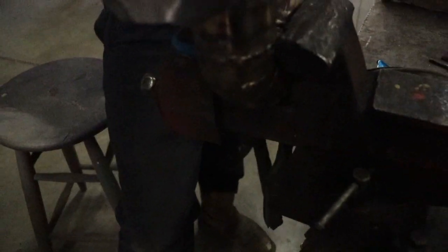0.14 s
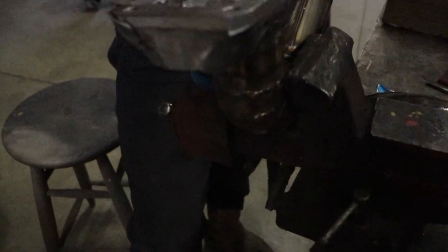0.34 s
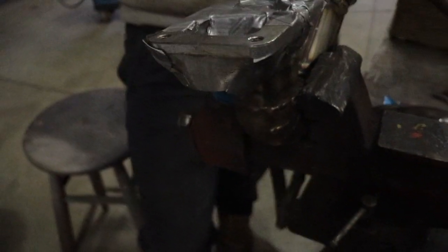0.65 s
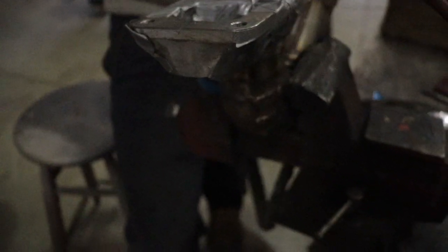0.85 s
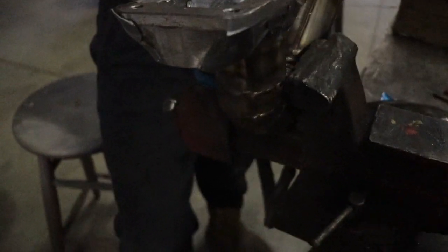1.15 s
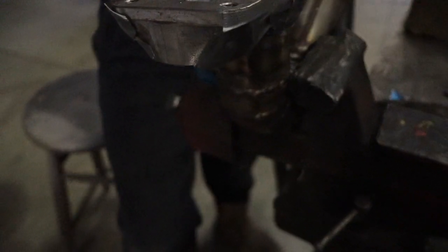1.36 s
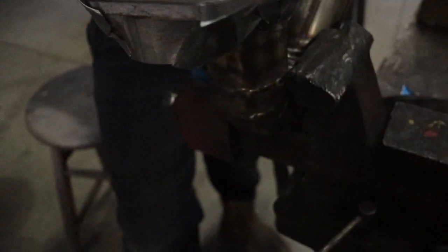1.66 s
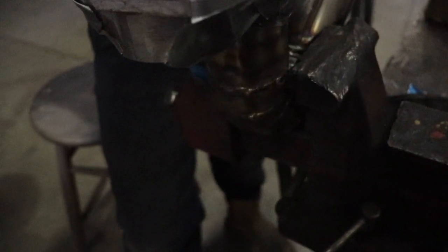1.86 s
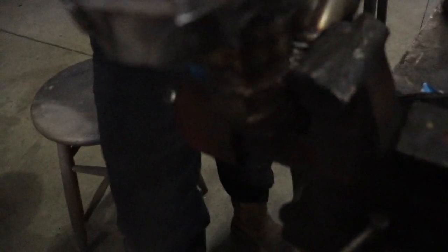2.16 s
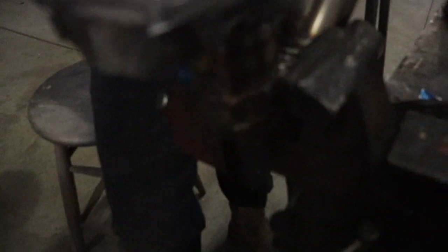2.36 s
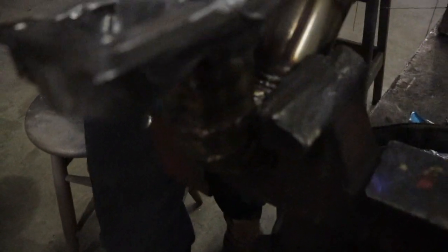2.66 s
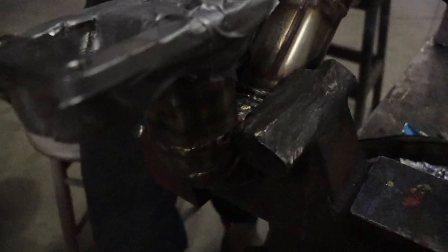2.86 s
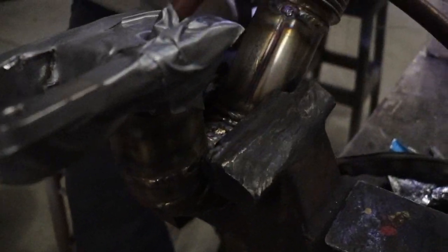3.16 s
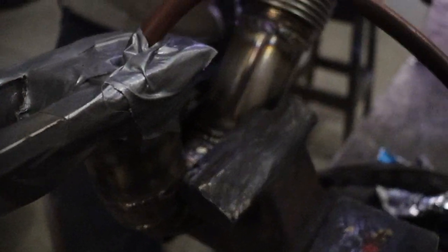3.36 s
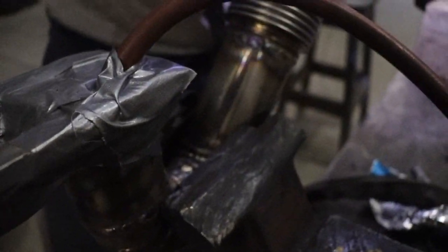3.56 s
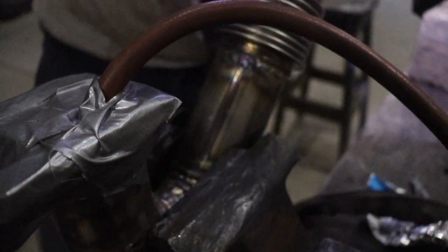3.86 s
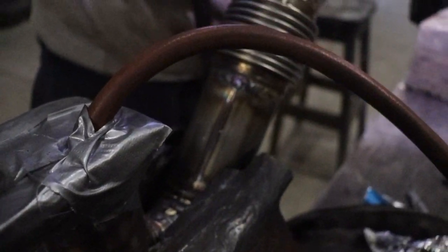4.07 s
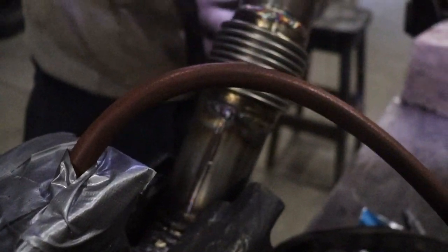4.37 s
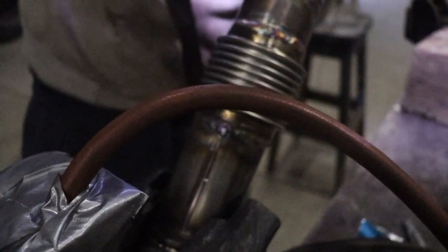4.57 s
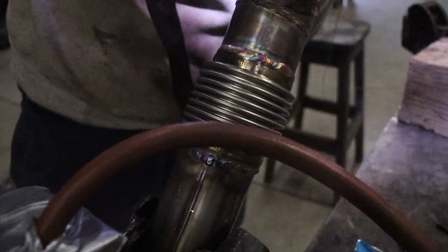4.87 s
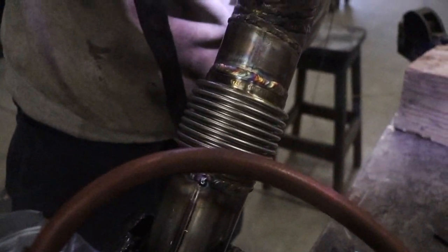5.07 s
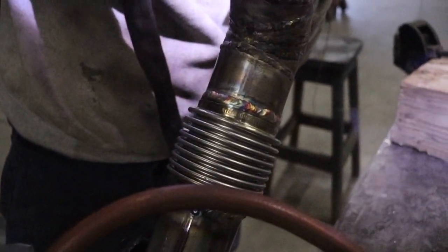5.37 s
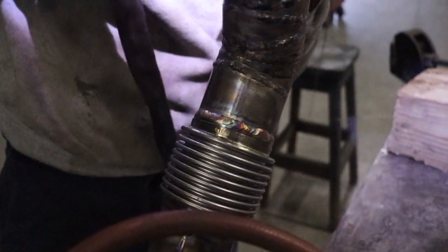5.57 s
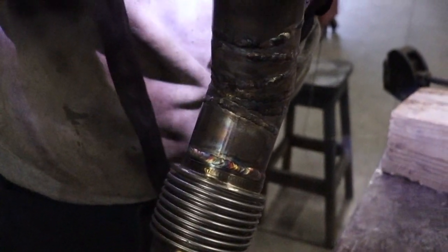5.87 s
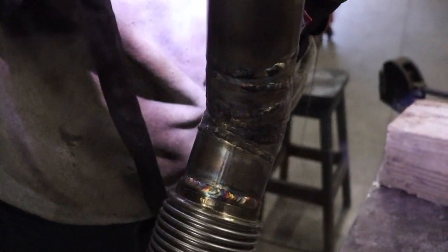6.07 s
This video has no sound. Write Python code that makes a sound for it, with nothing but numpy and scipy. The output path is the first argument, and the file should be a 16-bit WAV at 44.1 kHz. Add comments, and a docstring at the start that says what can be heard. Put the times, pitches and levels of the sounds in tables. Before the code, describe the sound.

A workshop hums with fan rush and low motor drone. A few small, dry, ringing clicks and a faint glove scrape come from a welding torch. A sharper click releases a gas surge, and at once a very loud, harsh mains-rate buzz throbs for under half a second and stops dead. A bright arc hiss remains, softening as the close microphone travels along the tube. Mono, little echo.

```python
"""A workshop where fans and a motor run all the time; TIG welding on stainless tubing.
The torch is handled: dry clicks that ring, and the grainy slide of a glove. The gas valve opens: a surge of noise.
The high-voltage starter sparks briefly in step with the mains: spike trains straight into the microphone's wiring.
The arc, noise with drifting resonances and sliding echoes, hisses as the microphone moves off.
The shop is shaped noise for the fans and wavering tones for the machines."""
import sys
import numpy as np
from scipy import signal
from scipy.fft import rfft, irfft, next_fast_len
from scipy.io import wavfile
from scipy.ndimage import map_coordinates

SR = 44100
rng = np.random.default_rng(int(sys.argv[2]) if len(sys.argv) > 2 else 0)


def generate_wav(sig):
    """Save sig (samples, or channels by samples) to the path in sys.argv[1] as 16-bit PCM at SR."""
    pcm = np.round(np.clip(np.atleast_2d(sig).T, -1, 1) * 32767).astype(np.int16)
    wavfile.write(sys.argv[1], SR, pcm)


N = 274302
TIME_S = np.arange(N) / SR

# Every spectrum is relative: its noise is scaled to rms 1 before use.
# arc resonances, low to high: pitch_hz, width_hz, level_db (relative), glide_share (of pitch, over the way)
ARC_RESONANCES = [(3210, 310, -7, .025), (6400, 850, -7, .06), (8230, 930, -6, .085)]
# arc hiss, body spectrum: freq_hz, density_db
ARC_BODY_SPECTRUM = [(1500, -25), (2500, 1.5), (4000, 0), (5000, -5), (6500, -1.5), (9600, -2),
                     (10400, -6.5), (11500, -25), (16000, -25)]
# arc hiss, top spectrum: freq_hz, density_db
ARC_TOP_SPECTRUM = [(9000, -30), (11000, 1.5), (12000, 1.5), (13200, 2), (14500, -8), (16000, -10.5)]
# the low resonance whistles least as the microphone passes side-on: centre_s, half_width_s, gain_db
WHISTLE_DIP = (4.3, 1.0, -4)
# argon flow spectrum: freq_hz, density_db
GAS_SPECTRUM = [(710, -34), (1200, -5), (1440, -4.5), (1750, -8), (1930, -7), (2680, -13), (3010, -7),
                (4170, -17), (4550, -15.5), (7020, -10), (10000, -18.5), (12900, -15), (16000, -28)]
# torch and gas valve clicks: start_s, level_db, t60_s, ring_hz, ring_db (relative to the click)
CLICKS = [(.4668, -47, .025, 14000, -9), (.492, -48, .025, 13500, -9), (.765, -58, .03, 13000, -3),
          (1.1633, -30, 0.033, 9100, -9), (1.178, -41, .03, 3550, -5), (1.2204, -31.5, 0.029, 4250, -6),
          (1.2335, -42, 0.035, 4300, -8), (1.764, -54, .04, 14000, -10), (1.7729, -47, .08, 3600, -6),
          (2.4124, -42, 0.044, 12500, -10), (2.4324, -28, 0.032, 7280, -8)]
# click body spectrum: freq_hz, density_db
CLICK_SPECTRUM = [(1500, -25), (2800, -4), (4500, 2), (7000, -0.5), (9500, -0.5), (11000, -8), (13500, 0),
                  (16000, -12)]
# torch body resonances under every click: pitch_hz, width_hz, level_db (relative)
TORCH_MODES = [(2750, 350, -11.5), (3570, 200, -10.5), (6370, 170, -15)]
# glove strokes over the work: start_s, length_s, level_db
GLOVE_STROKES = [(1.755, 0.11, -52.5), (1.848, 0.16, -50.5)]
# glove slide spectrum: freq_hz, density_db
GLOVE_SPECTRUM = [(1000, -25), (2500, 8.5), (5000, 2), (9000, -4), (11000, -16), (16000, -19)]
# fan and duct spectrum: freq_hz, density_db
FAN_SPECTRUM = [(25, -36), (55, -35), (100, -8), (130, 1.5), (165, -3), (205, -3), (250, -4), (400, 1),
                (600, -2.5), (780, -4.5), (1000, -7.5), (1350, -8), (1750, -13), (2700, -21), (4100, -26),
                (5200, -30), (6800, -29.5), (10300, -39.5), (16000, -48.5)]
# motor, transformer and fan blade tones: pitch_hz, level_db (rms), waver_share (of level)
MACHINE_TONES = [(75.3, -53.5, 0.088), (119.8, -49.5, 0.34), (151.1, -39.5, 0.25), (354, -45, 0.22),
                 (456.6, -45.5, 0.59), (948, -56.5, 0.51), (1055, -57.5, 0.51), (2098, -63.5, 0.35),
                 (3990, -69, 0.73)]
# close pair of fan whines: pitch_hz, level_db (relative)
WHINES = [(1372.5, -0.5), (1401, -2.5)]
# loud spots of the room that the microphone passes: centre_s, half_width_s, gain_db
ROAR_SPOT = (3.25, 0.63, 4.4)
WHINE_SPOT = (3.72, 0.77, 5.7)

# microphone rests, then travels along the tube at an even pace
MOVE_START_S, MOVE_LENGTH_S = 2.3, 3.6
# starter
MAINS_HZ, SPARK_START_S, SPARK_END_S = 60, 2.5304, 2.906
FIRING_SHARE = 0.3  # of the mains crest; no sparks below it
THROB_GAIN_DB, LEAK_HZ, INPUT_BASS_CUT_HZ = 19.2, 84, 33
THROB_SURGE_DB, THROB_SURGE_S = 2.5, 0.033  # strongest as it switches on
# arc gain, close up and from afar
ARC_NEAR_DB, ARC_FAR_DB, RECEDE_HALF_WIDTH_S = -46, -50.5, 0.91
# gas
GAS_START_S, GAS_RISE_S, GAS_HOLD_S = 2.432, 0.0018, 0.41
GAS_DB, GAS_SAG_DB_PER_S, GAS_RELEASE_DB_PER_S = -37, 7.5, 40
# shop: level at rest, change by the end of the turn (fans) or of the way (others)
FANS_DB, FANS_TURN_DB, TURN_S = -36, -2, 0.93
ROAR_DB, ROAR_CHANGE_DB = -43, -2.5
WHINE_DB, WHINE_CHANGE_DB = -52.5, -5
DRONE_HZ, DRONE_DB, DRONE_CHANGE_DB = 304.4, -40.5, -15.5  # a motor overtone
# recorder band limit
EDGE_HZ = 15780


def arc(body_db=-3, top_db=-9, whistle_db=1, sway_share=0.008):
    """Takes hold while the starter sparks; hiss fades and resonances drift as the microphone moves off."""
    moved = progress(MOVE_START_S, MOVE_LENGTH_S)
    bands = []
    for pitch_hz, width_hz, level_db, glide_share in ARC_RESONANCES:
        drifting_hz = pitch_hz * (1 + glide_share * moved + sway_share * wander(2))
        bands.append(amp(level_db) * resonance(drifting_hz, width_hz))
    low, middle, high = bands
    hiss = amp(body_db) * noise(ARC_BODY_SPECTRUM) + amp(top_db) * noise(ARC_TOP_SPECTRUM) + middle + high
    whistle = amp(whistle_db + swell(*WHISTLE_DIP)) * low
    lit = progress(SPARK_START_S, SPARK_END_S - SPARK_START_S)
    level_db = ARC_FAR_DB + swell(SPARK_END_S, RECEDE_HALF_WIDTH_S, ARC_NEAR_DB - ARC_FAR_DB)
    return lit * amp(level_db) * (reflections(hiss) + whistle)


def reflections(x, count=7):
    """Echoes off tube, vice and mask come and go; paths lengthen as the microphone moves, so the comb slides."""
    strength, shortest_s, spread_s = 0.33, 0.0004, 0.0014
    stretch_per_s, sway_share = 0.16, 0.03
    out = x.copy()
    for delay, drift in rng.random((count, 2)):
        stretch = 1 + stretch_per_s * drift * (TIME_S - SPARK_END_S) + sway_share * wander(0.88)
        lag_s = (shortest_s + spread_s * delay) * stretch
        echo = map_coordinates(x, [(TIME_S - lag_s) * SR], order=3)
        out += strength * wander(1.4) * echo
    return out / np.sqrt(1 + count * strength ** 2)


def starter(crest_sparks_per_s=4300, spike_db=-13.5, back_charge_db=-9.5, back_spike_db=-13):
    """Spark gap fires faster as the mains voltage rises; each spark is picked up as a spike and a slow sag."""
    jitter_db, unsteady_db, scatter_db, back_scatter_db = 1.6, 1.3, 1.4, 2.2
    mains = np.sin(2 * np.pi * MAINS_HZ * (TIME_S - SPARK_START_S))
    switched_on = (TIME_S > SPARK_START_S) & (TIME_S < SPARK_END_S)
    firing = switched_on & (abs(mains) > FIRING_SHARE)
    unsteadiness = amp(jitter_db * wander(2500) + unsteady_db * wander(60))
    sparks_per_s = crest_sparks_per_s * abs(mains) * firing * unsteadiness
    fired = np.diff(np.ceil(np.cumsum(sparks_per_s) / SR), prepend=0)
    # reverse half cycles: weaker sparks, built up over the first cycles
    reverse = amp(back_scatter_db * wander(40)) * progress(SPARK_START_S, 0.053)
    scatter = amp(scatter_db * rng.standard_normal(N))
    spikes = fired * np.where(mains > 0, 1, amp(back_spike_db) * reverse) * scatter
    spikes = signal.lfilter([1, 0.3], [1], spikes)
    # charge piles up and leaks away: a heavy throb that the input's bass cut swings about zero
    charge = fired * np.where(mains > 0, 1, amp(back_charge_db) * reverse)
    charge = signal.lfilter(*signal.butter(1, LEAK_HZ, fs=SR), charge)
    throb = amp(THROB_GAIN_DB + swell(SPARK_START_S, THROB_SURGE_S, THROB_SURGE_DB)) * charge
    pickup = amp(spike_db) * spikes + throb
    return signal.lfilter(*signal.butter(2, INPUT_BASS_CUT_HZ, "high", fs=SR), pickup)


def gas():
    """Argon surges from the cup as the valve opens, sags while the hose empties, then dies away."""
    age_s = np.maximum(TIME_S - GAS_START_S, 0)
    sag_db = GAS_SAG_DB_PER_S * age_s
    release_db = GAS_RELEASE_DB_PER_S * np.maximum(age_s - GAS_HOLD_S, 0)
    return progress(GAS_START_S, GAS_RISE_S) * amp(GAS_DB - sag_db - release_db) * noise(GAS_SPECTRUM)


def handling():
    """Torch and valve clicks over the glove's slide."""
    return glove() + clicks()


def glove(grain_db=3.5):
    """Sliding friction: half-sine strokes of noise, made grainy by fast random level."""
    strokes = sum(amp(level_db) * np.sin(np.pi * progress(start_s, length_s))
                  for start_s, length_s, level_db in GLOVE_STROKES)
    return strokes * amp(grain_db * wander(150)) * noise(GLOVE_SPECTRUM)


def clicks(rise_s=0.00048, room_db=-27, room_t60_s=0.39, ring_width_hz=250, tick_db=-2):
    """Small dry impacts: torch body modes and one ring each, with a faint room tail."""
    body = amp(tick_db) * noise(CLICK_SPECTRUM)
    body += sum(amp(level_db) * resonance(pitch_hz, width_hz) for pitch_hz, width_hz, level_db in TORCH_MODES)
    out = np.zeros(N)
    for start_s, level_db, t60_s, ring_hz, ring_db in CLICKS:
        age_s = np.maximum(TIME_S - start_s, 0)
        attack = 1 - np.exp(-age_s / rise_s)
        decay = amp(-60 * age_s / t60_s) + amp(room_db - 60 * age_s / room_t60_s)
        ring = amp(ring_db) * resonance(ring_hz, ring_width_hz)
        out += amp(level_db) * attack * decay * (body + ring)
    return out


def shop():
    """Fans and machines heard from the moving microphone."""
    return fans() + machines()


def fans(flutter_db=0.48, low_cut_hz=50, roar_hz=400, roar_width_hz=120):
    """Air noise: a fluttering rush that drops as the microphone first turns away, and a resonant roar."""
    moved = progress(MOVE_START_S, MOVE_LENGTH_S)
    rush_db = FANS_DB + FANS_TURN_DB * progress(MOVE_START_S, TURN_S) + flutter_db * wander(24)
    rush = amp(rush_db) * noise(FAN_SPECTRUM)
    rush = signal.lfilter(*signal.butter(2, low_cut_hz, "high", fs=SR), rush)
    roar_db = ROAR_DB + ROAR_CHANGE_DB * moved + swell(*ROAR_SPOT)
    return rush + amp(roar_db) * resonance(roar_hz, roar_width_hz)


def machines():
    """Rotation and mains hum as wavering tones; whine and drone change level along the way."""
    moved = progress(MOVE_START_S, MOVE_LENGTH_S)
    hum = sum(amp(level_db) * tone(pitch_hz, waver_share) for pitch_hz, level_db, waver_share in MACHINE_TONES)
    whine = sum(amp(level_db) * tone(pitch_hz, waver_share=0.2) for pitch_hz, level_db in WHINES)
    whine *= amp(WHINE_DB + WHINE_CHANGE_DB * moved + swell(*WHINE_SPOT))
    drone = amp(DRONE_DB + DRONE_CHANGE_DB * moved) * tone(DRONE_HZ, waver_share=0.24)
    return hum + whine + drone


def tone(pitch_hz, waver_share, waver_hz=4):
    """Machine tone of rms 1; strength and phase wander on its way through the room."""
    wobble = (wander(waver_hz) + 1j * wander(waver_hz)) / np.sqrt(2)
    carrier = np.exp(2j * np.pi * (pitch_hz * TIME_S + rng.random()))
    return unit(((1 + waver_share * wobble) * carrier).real)


def resonance(pitch_hz, width_hz):
    """Noise of rms 1 in a steep resonance (double pole); pitch may be a curve."""
    r = np.exp(-np.pi * 1.5 * width_hz / SR)
    white = rng.standard_normal(N) + 1j * rng.standard_normal(N)
    slow = signal.lfilter([1], [1, -2 * r, r * r], white)
    cycles = np.cumsum(pitch_hz * np.ones(N)) / SR
    return unit((slow * np.exp(2j * np.pi * cycles)).real)


def noise(spectrum):
    """Noise of rms 1 with a spectrum of (freq_hz, density_db) points."""
    return shaped(lambda hz: colour(spectrum, hz))


def wander(top_hz):
    """Slow random motion of rms 1, up to about top_hz."""
    return shaped(lambda hz: np.exp(-np.minimum(hz / top_hz, 10) ** 2) * (hz > 0))


def shaped(gain_at):
    """Noise of rms 1 whose spectrum is the given function of frequency."""
    size = next_fast_len(N, real=True)
    spectrum = rfft(rng.standard_normal(size)) * gain_at(np.fft.rfftfreq(size, 1 / SR))
    return unit(irfft(spectrum, size)[:N])


def colour(points, hz):
    """Gain at the given frequencies, interpolated in dB over log frequency."""
    freq_hz, level_db = np.transpose(points)
    return amp(np.interp(np.log(hz + 1), np.log(freq_hz + 1), level_db))


def progress(start_s, length_s):
    """Rises evenly from 0 to 1 over the given time."""
    return np.clip((TIME_S - start_s) / length_s, 0, 1)


def swell(centre_s, half_width_s, gain_db):
    """Smooth rise and fall in dB around one moment."""
    return gain_db * np.exp(-((TIME_S - centre_s) / half_width_s) ** 2)


def amp(db):
    """Decibels to gain."""
    return 10 ** (np.asarray(db) / 20)


def unit(x):
    """Scales to rms 1."""
    return x / np.sqrt(np.mean(x ** 2) + 1e-20)


def scene():
    """All sources reach one microphone; both channels are alike."""
    mono = arc() + starter() + gas() + handling() + shop()
    return np.array([mono, mono])


def record(dry):
    """The recorder's steep band limit."""
    lowpass = signal.firwin(1023, EDGE_HZ, window=("kaiser", 9), fs=SR)
    return signal.oaconvolve(dry, lowpass[None], "same")


dry = scene()
out = record(dry)
generate_wav(out)
```